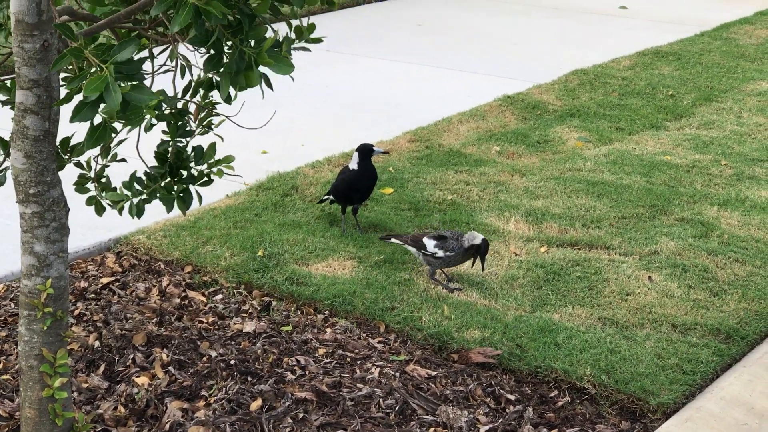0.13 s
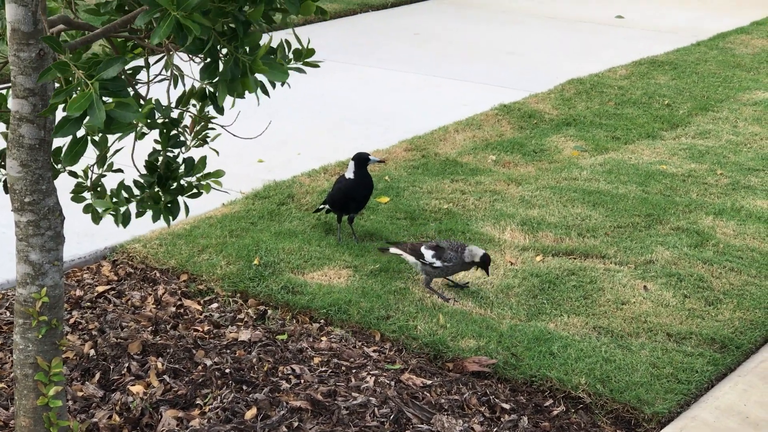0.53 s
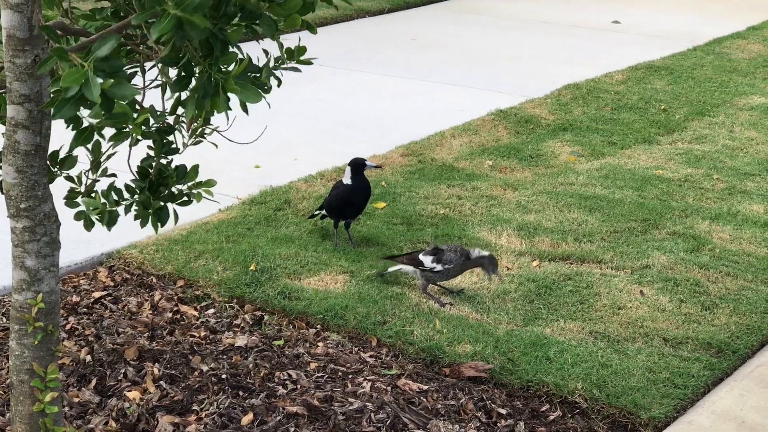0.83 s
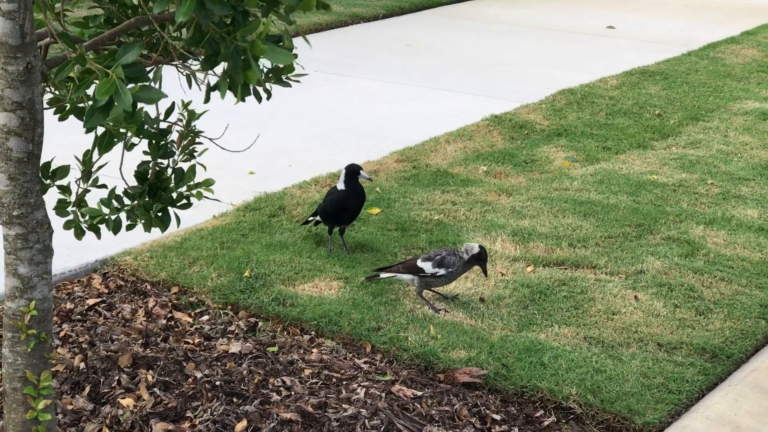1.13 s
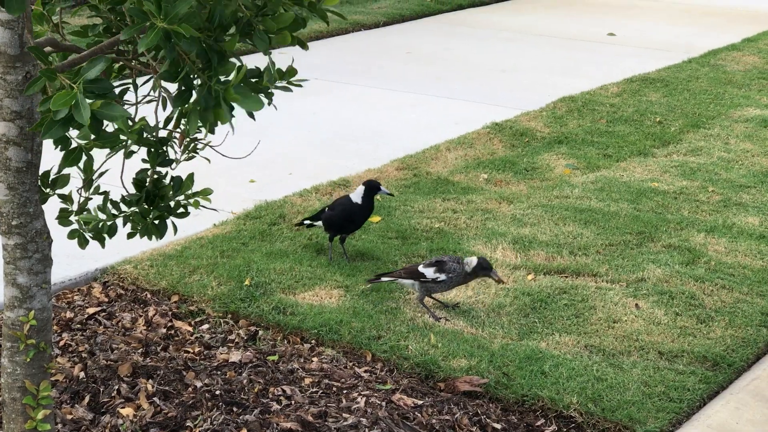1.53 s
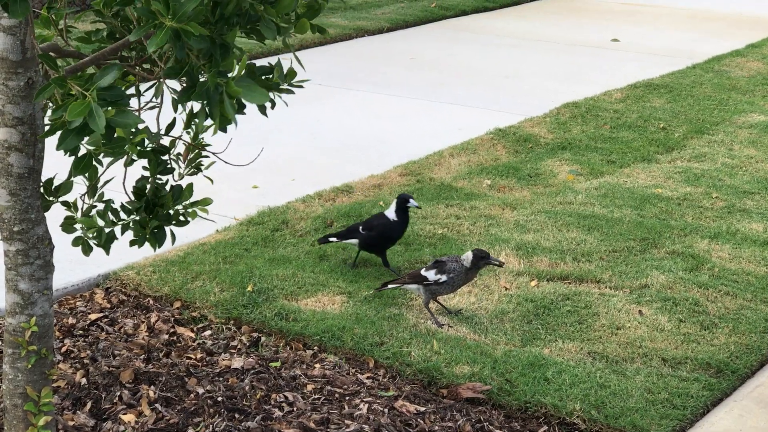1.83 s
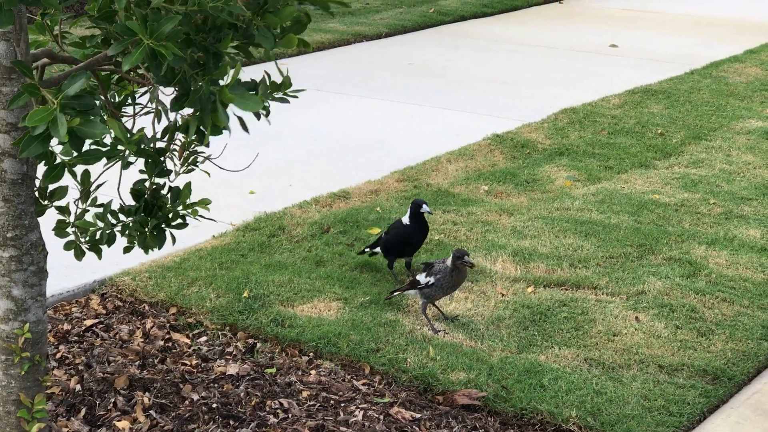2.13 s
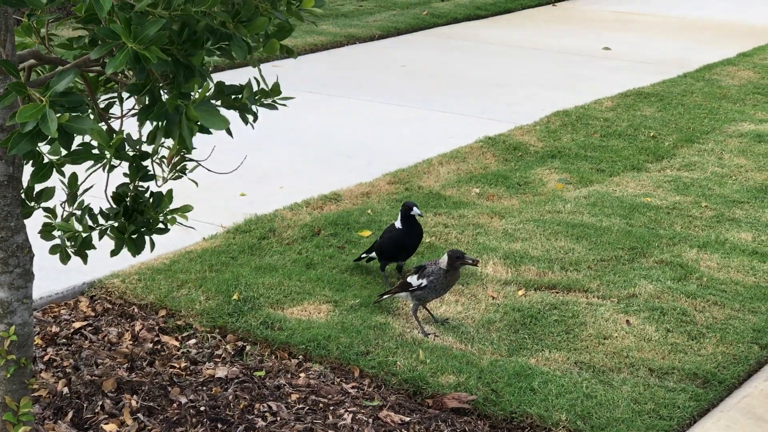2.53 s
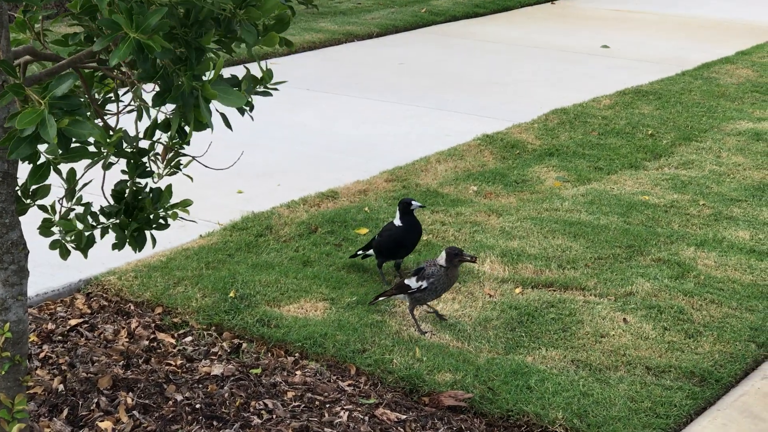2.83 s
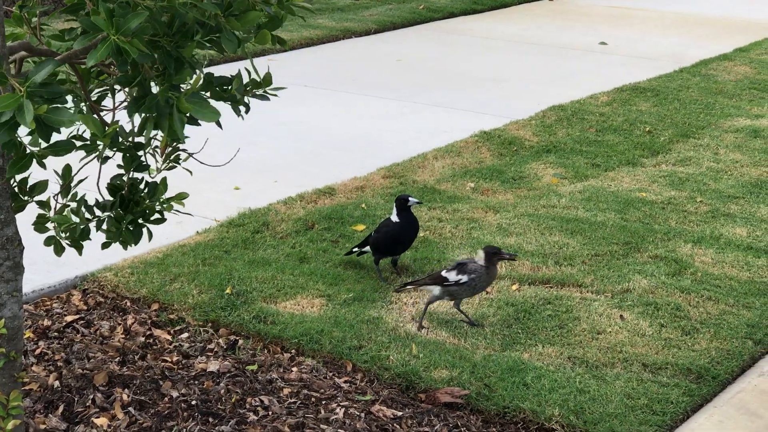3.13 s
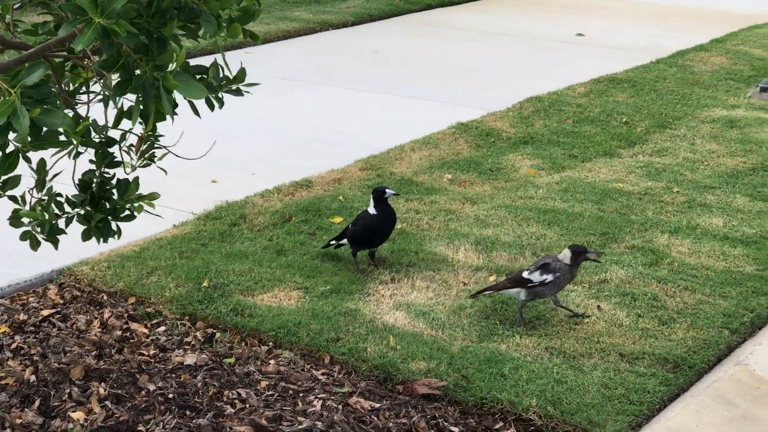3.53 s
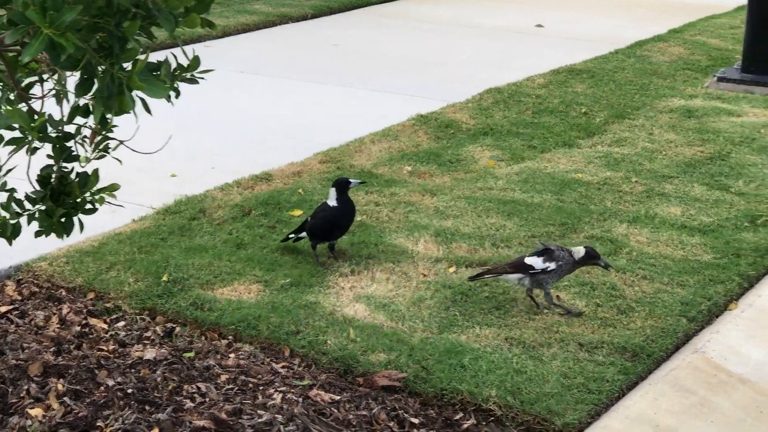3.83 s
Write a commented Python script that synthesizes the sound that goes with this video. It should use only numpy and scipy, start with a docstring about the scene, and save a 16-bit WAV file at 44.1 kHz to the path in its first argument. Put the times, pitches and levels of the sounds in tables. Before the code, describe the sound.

Whining squawks of a begging young magpie outdoors, one cracking into a rasp, above faint rumble.

```python
"""A young magpie begs on a suburban lawn: harsh rising whines, each a stack of clean harmonics
coloured by throat and beak. One call breaks into a rasp halfway, built from whole and half multiples.
Nearby walls and fences send back faint delayed copies and a thin scattered tail.
A far engine, a wavering low sine, drones under rumble and outdoor hiss; an insect, chirps and ticks
add small detail, and damped low swings are bumps on the microphone at the start."""
import sys
import numpy as np
from scipy import signal
from scipy.fft import rfft, irfft, next_fast_len
from scipy.io import wavfile
from scipy.ndimage import uniform_filter1d

SR = 44100
rng = np.random.default_rng(int(sys.argv[2]) if len(sys.argv) > 2 else 0)


def master(y):
    """Save y as 16-bit WAV."""
    cut = np.clip(np.atleast_2d(y).T, -1, 1)
    pcm = np.round(cut * 32767)  # scale
    wavfile.write(sys.argv[1], SR, pcm.astype(np.int16))


N = 175077
TIME = np.arange(N) / SR  # seconds


def from_db(db):
    """The decibel law: 20 dB is a tenfold amplitude."""
    return 10 ** (np.asarray(db) / 20)


def rms_one(x):
    """Normalisation of signal power: scale to unit rms."""
    return x / np.sqrt(np.mean(x ** 2) + 1e-20)


def at_hz(points, hz):
    """Interpolation of a spectrum in dB on a logarithmic frequency axis."""
    at, db = np.transpose(points)
    return np.interp(np.log(hz + 1e-9), np.log(at), db)


def bell(offset, half_width):
    """Gaussian weighting: height 1, falling to 1/e at the half width."""
    return np.exp(-(offset / half_width) ** 2)


def drift(rate, size):
    """Random modulation: normal values, rate of them a second, joined by lines and scaled to rms 1."""
    at = np.arange(size) * rate / SR
    values = rng.standard_normal(size // 8)
    return rms_one(np.interp(at, np.arange(size // 8), values))


def noise(spectrum, size):
    """Spectral shaping: white noise weighted in the frequency domain, rms 1."""
    padded = next_fast_len(size)
    hz = np.arange(padded // 2 + 1) * SR / padded
    white = rfft(rng.standard_normal(padded))
    return rms_one(irfft(white * from_db(at_hz(spectrum, hz)), padded)[:size])


def controls(rows):
    """Continuous gesture: the samples it covers, and its columns interpolated and smoothed along them."""
    s, *columns = np.transpose(rows)
    span = np.flatnonzero((TIME >= s[0]) & (TIME <= s[-1]))
    return span, [uniform_filter1d(np.interp(TIME[span], s, c), size=180) for c in columns]


def phase_of(hz):
    """Phase in radians is the running integral of frequency."""
    return 2 * np.pi * np.cumsum(hz) / SR


# Level of the far engine. Each row: time in seconds, level in dB before the ENGINE_DB trim.
ENGINE_POINTS = [(.25, -59), (.72, -47), (1.07, -50), (1.2, -45.5), (1.58, -47), (1.68, -58.5), (1.86, -46),
                 (1.93, -63), (2.05, -47), (2.26, -45.5), (2.34, -73.5), (2.78, -54), (3.97, -57.5)]
# Colour of the low rumble. Each row: frequency in Hz, relative density in dB per Hz.
RUMBLE_COLOUR = [(25, -15), (40, -1.5), (60, 8), (90, 1.5), (115, -3), (145, -2.5), (290, -15), (600, -42)]
# Colour of the outdoor hiss. Each row: frequency in Hz, relative density in dB per Hz.
HISS_COLOUR = [(150, -7.5), (450, 2), (1450, -1), (2100, -6), (4300, -9), (5000, -13.5), (6500, -16.5),
               (7700, -27), (9800, -25), (10400, -48), (11100, -27), (15500, -20)]
ENGINE_HZ, ENGINE_DB, ENGINE_WANDER = 60.84, -1, 0.025  # wander: rms fraction of the frequency
TRAFFIC_HZ, TRAFFIC_DB = 138.2, -64.5
RUMBLE_DB, RUMBLE_SWELL_DB = -53, 1.5
HISS_DB = -66


def street():
    """Superposition: frequency-modulated engine drone and fainter hum over broadband rumble and hiss."""
    engine_phase = phase_of(ENGINE_HZ * (1 + ENGINE_WANDER * drift(16, N)))
    engine_db = np.interp(TIME, *np.transpose(ENGINE_POINTS)) + ENGINE_DB
    drone = from_db(engine_db) * np.sin(engine_phase)
    hum_gain = from_db(TRAFFIC_DB + 1.14 * drift(8.5, N))
    hum = hum_gain * np.sin(phase_of(TRAFFIC_HZ * (1 + 0.0199 * drift(5, N))))
    rumble = from_db(RUMBLE_DB + RUMBLE_SWELL_DB * drift(11, N)) * noise(RUMBLE_COLOUR, N)
    hiss = from_db(HISS_DB) * noise(HISS_COLOUR, N)
    return np.sqrt(2) * (drone + hum) + rumble + hiss


INSECT_HZ, INSECT_WIDTH_HZ, INSECT_DB = 8770, 330, -86


def insect():
    """Band-limited noise: a narrow filter leaves a thin insect hiss."""
    edges = [INSECT_HZ - INSECT_WIDTH_HZ / 2, INSECT_HZ + INSECT_WIDTH_HZ / 2]
    band = signal.butter(2, edges, "band", fs=SR, output="sos")
    return from_db(INSECT_DB) * rms_one(signal.sosfilt(band, rng.standard_normal(N)))


# Chirps of far birds. Each row: centre in seconds, pitch in Hz, rms level in dB at the centre.
CHIRP_ROWS = [(1.03, 3150, -73.5), (3.215, 4530, -71.5)]
CHIRP_S = .025  # half width


def chirps():
    """Tone bursts: an unsteady sine under a Gaussian envelope."""
    out = np.zeros(N)
    for s, hz, db in CHIRP_ROWS:
        tone = np.sqrt(2) * np.sin(phase_of(hz * (1 + 0.0118 * drift(400, N))))
        out += from_db(db) * bell(TIME - s, CHIRP_S) * tone
    return out


# Small ticks in the grass and mulch. Each row: start in seconds, rms level in dB at the start.
TICK_ROWS = [(0.86, -59), (3.687, -59)]
TICK_T60_S = 0.038


def ticks():
    """Exponential decay: each tick is coloured noise that starts at once and dies away."""
    out = np.zeros(N)
    crackle = noise([(500, -18), (1500, 18), (15000, -37)], N)  # (Hz, dB)
    for s, db in TICK_ROWS:
        age = np.clip(TIME - s, 0, 1)
        out += crackle * (TIME >= s) * from_db(db - 60 * age / TICK_T60_S)
    return out


# Bumps on the microphone. Each row: start in seconds, frequency in Hz, amplitude in dB before the
# attack and decay, 60 dB decay time in seconds.
BUMP_ROWS = [(.002, 138, -19, 0.024), (0.118, 116.6, -40.5, 0.31), (.162, 276.5, -32, 0.049),
             (0.173, 98, -25, 0.076)]
BUMP_ATTACK_S = 0.0015


def bumps():
    """Damped oscillation: each bump is a low sine that decays exponentially."""
    out = np.zeros(N)
    for s, hz, db, t60 in BUMP_ROWS:
        age = np.clip(TIME - s, 0, 1)
        attack = (1 - np.exp(-age / BUMP_ATTACK_S)) ** 2
        out += from_db(db - 60 * age / t60) * attack * np.sin(2 * np.pi * hz * age)
    return out


# Echoes from walls and fences. Each row: delay in seconds, gain in dB.
ECHO_ROWS = [(0.023, -19.5), (0.088, -28.5)]
# Colour of the scattered tail. Each row: frequency in Hz, relative level in dB.
SCATTER_SPECTRUM = [(1250, -8), (2380, -12), (2610, 4.5), (2850, -7), (9000, -8.5)]
SCATTER_DB, SCATTER_T60_S = -21, 0.84
ECHO_CUT_HZ = 15000


def garden(x):
    """Convolution with an impulse response: discrete reflections and a decaying scattered tail."""
    tail = noise(SCATTER_SPECTRUM, SR) * from_db(-60 * TIME[:SR] / SCATTER_T60_S)
    response = from_db(SCATTER_DB) * rms_one(tail) / np.sqrt(SR)  # unit energy, then the gain
    for delay, db in ECHO_ROWS:
        response[int(delay * SR)] += from_db(db)
    lowpass = signal.butter(2, ECHO_CUT_HZ, fs=SR, output="sos")
    return signal.sosfilt(lowpass, signal.fftconvolve(x, response)[:N])


# The last of an earlier whine, dying away in its echo.
# Each row: time in seconds, pitch in Hz, rms level in dB.
LAST_ROWS = [(0, 1246, -46.5), (.027, 1286, -45), (.036, 1347, -53.5), (.064, 1264, -62),
             (.125, 1295, -63.5), (.165, 1190, -69)]


def last_of_whine():
    """A pure tone: only the fundamental is left as the beak closes."""
    span, (pitch, db) = controls(LAST_ROWS)
    out = np.zeros(N)
    out[span] = np.sqrt(2) * from_db(db) * np.sin(phase_of(pitch))
    return out


# Colour of the breath turbulence, in rasp and whine. Each row: frequency in Hz, relative level in dB.
AIR_SPECTRUM = [(700, -22), (1500, -6), (3300, 20), (5500, -4), (9500, -8.5), (15000, -18)]
# The voice break. Each row: time in seconds, pitch in Hz, level in dB of the partials before the rattle.
RASP_ROWS = [(1.556, 1173, -62), (1.559, 1180, -49.5), (1.58, 1151, -53.5), (1.61, 1155, -56.5),
             (1.635, 1129, -55), (1.647, 1012, -53), (1.655, 994, -50), (1.66, 1220, -65)]
# Unsteady partials of the break. Each row: multiple of the pitch, relative level in dB.
RASP_PARTIAL_ROWS = [(1, -9.5), (1.5, 4.5), (2, -3), (2.5, -7), (3, 4), (4, -27)]
# Jitter: rms fraction of the pitch; slip: rms radians; air: relative to the partials at the loudest.
RASP_JITTER, RASP_FLUTTER_DB, RASP_SLIP, RASP_AIR_DB = 0.014, 3.5, .7, -5
RATTLE_HZ, RATTLE_DEPTH = 230, .75


def rasp():
    """Period doubling: the syrinx adds half multiples, rattles unevenly and is noisiest when loudest."""
    span, (pitch, level_db) = controls(RASP_ROWS)
    size = len(span)
    phase = phase_of(pitch * (1 + RASP_JITTER * drift(604, size)))
    voice = np.zeros(size)
    for k, db in RASP_PARTIAL_ROWS:
        gain = from_db(db + RASP_FLUTTER_DB * drift(321, size))
        voice += gain * np.sin(k * phase + RASP_SLIP * drift(394, size))
    rattle = 1 + RATTLE_DEPTH * np.cos(phase_of(RATTLE_HZ * (1 + drift(RATTLE_HZ, size) / 2)))
    air = from_db(RASP_AIR_DB + level_db - level_db.max()) * noise(AIR_SPECTRUM, size)
    out = np.zeros(N)
    out[span] = from_db(level_db) * rms_one(rattle) * (rms_one(voice) + air)
    return out


# Gestures of the whines. Each row: time in seconds, pitch in Hz, fundamental level in dB, overtone
# level in dB at 3 kHz before the throat and beak, brightness in dB per octave, beak resonance in Hz.
BEFORE_BREAK = [(1.448, 1090, -90, -83, 9, 3640.0), (1.457, 1065, -54.5, -67.5, -2, 3160.0),
                (1.475, 1115, -51.5, -58.5, 0, 3300), (1.505, 1126, -51.8, -56.5, -3, 3340),
                (1.54, 1138, -49, -54.5, -3, 4070), (1.557, 1134, -47, -60, 0.5, 3380),
                (1.562, 1260, -45, -70, -1.8, 3620.0)]
AFTER_BREAK = [(1.652, 1310, -76, -93, -6, 2600), (1.659, 1247, -48.5, -55.5, 0, 2570),
               (1.689, 1231, -49, -59, -3, 2430), (1.715, 1228, -49, -60, -1.5, 2474),
               (1.735, 1137, -56, -70.5, -2, 2180), (1.752, 983, -88, -86, -5, 2095)]
LOUD_WHINE = [(2.003, 648, -72, -88, -17, 2440.0), (2.015, 795, -67, -72, -1, 2670),
              (2.029, 881, -63.5, -64, 5, 2960), (2.075, 927, -58.0, -59, 4, 2730),
              (2.093, 962, -52, -53, 2.5, 3580), (2.102, 945, -53, -52, 1.5, 3400),
              (2.119, 1086, -46.5, -50, 1.5, 3530), (2.155, 1098, -46, -54.5, 5, 3490),
              (2.2, 1164, -43.5, -52.5, 3.5, 2840), (2.254, 1235, -40.5, -54, 1.5, 2840),
              (2.308, 1273, -45, -63, -7.5, 3400), (2.319, 1262, -76, -64, -15, 3600)]
RISING_WHINE = [(2.598, 712, -85, -100, -17, 2750.0), (2.62, 903, -59.5, -72.5, 3, 2314),
                (2.645, 927, -52.4, -64.5, 3, 2400), (2.7, 999, -52, -64, 1.5, 2800),
                (2.745, 1105, -45.5, -61, 5, 2940), (2.796, 1202, -41.5, -61.5, 2.5, 2220),
                (2.834, 1290, -39.0, -66, 4.5, 3160), (2.895, 1356, -40.5, -62, 2, 1713),
                (2.921, 1382, -45.5, -71, -3, 1650), (2.955, 1060, -63.5, -86, 3, 2060)]
ARCHED_WHINE = [(3.24, 684, -70, -92, -23, 2350), (3.255, 848, -63, -68.5, 4, 1900),
                (3.276, 916, -57.5, -62, 1.5, 2200), (3.343, 1063, -49, -61.5, 5.5, 3200),
                (3.375, 1147, -45, -61.5, 4, 3270), (3.41, 1184, -44, -58.5, 2.5, 2920),
                (3.449, 1246, -42, -64.5, 8, 2450.0), (3.525, 1301, -38.5, -61, 1, 1920),
                (3.555, 1285, -42, -64.5, 2, 2200), (3.593, 1035, -65, -79, -2, 2850)]
SOFT_WHINE = [(3.722, 756, -68, -84, -1, 1846), (3.736, 897, -65, -72.5, 0.5, 3100),
              (3.769, 923, -61, -64, -3, 2760), (3.804, 1008, -54.5, -67.5, 0, 3190),
              (3.866, 1084, -60, -64.5, 3, 2400), (3.911, 1149, -53.5, -65, 1.5, 2420),
              (3.935, 1106, -71, -71, 1, 2650), (3.965, 950, -58.5, -83, -9, 2870)]
# The calls. Each row: gesture, changes in dB of the 2nd, 3rd and 4th harmonics, weak harmonic number.
WHINES = [(BEFORE_BREAK, -7, 2.8, 2.6, 6.3), (AFTER_BREAK, 1.3, -8, -5.5, 5.7),
          (LOUD_WHINE, 1.8, 0.25, 3.9, 7.03), (RISING_WHINE, 3.7, 3.3, 3.7, 6.83),
          (ARCHED_WHINE, 3.7, 0.94, 2.6, 6.25), (SOFT_WHINE, 1.8, 2.4, 6.9, 6.96)]
# Fixed colour of the throat. Each row: frequency in Hz, gain in dB.
THROAT_COLOUR = [(1600, 3.2), (2400, -1.5), (3300, .4), (4400, -6), (5500, -9), (8800, -9), (10400, -16),
                 (11500, -15.5), (13500, -24.6), (15500, -33.5)]
# The voice catches: overtones near a frequency briefly change level.
# Each row: centre in seconds, frequency in Hz, change in dB.
CATCH_ROWS = [(2.099, 5700, 15.5), (2.818, 2510, 0), (3.352, 4300, -13), (3.491, 2550, -10)]
CATCH_S, CATCH_HALF_WIDTH_HZ = 0.018, 360
BEAK_BOOST, BEAK_HALF_WIDTH_HZ = 4.32, 180  # boost: amplitude added at resonance
JITTER, JITTER_PER_S = 0.0037, 200  # rms fraction of the pitch, random values a second
SHIMMER_DB, OVERTONE_WAVER_DB = .5, 1.02  # the waver is per octave of harmonic number
BEAT_HZ, BEAT_HALF_WIDTH_HZ, BEATS_PER_S, BEAT_DEPTH = 2640, 110, 55, .5  # mean beat rate
NOTCH_DB, NOTCH_HALF_WIDTH = -15, 0.69  # depth, half width in harmonics
# The notch fills in as the treble approaches the first level, over the range that follows.
NOTCH_GONE_DB, NOTCH_FILL_DB = -49.5, 0.5
AIR_DB = -29  # turbulence against the overtones, before it pulses with the voice
ROUGH_GLIDE_HZ_PER_S = 4200  # turbulence grows where the pitch slips faster than this
PUFF_DB, PUFF_S = -64.5, 0.009  # rough start: level before the pulsing, delay and half width
ATTACK_S, RELEASE_S = 0.0022, 0.0023


def whine(rows, second_db, third_db, fourth_db, weak_harmonic):
    """Source and filter: a puff, then syrinx harmonics that sweep through throat and beak resonances."""
    span, (pitch, fundamental_db, overtones_db, bright_db, beak_hz) = controls(rows)
    size, t = len(span), TIME[span]
    low_db = {2: second_db, 3: third_db, 4: fourth_db}
    phase = phase_of(pitch * (1 + JITTER * drift(JITTER_PER_S, size)))
    treble_db = overtones_db + bright_db
    notch_db = NOTCH_DB * np.clip((NOTCH_GONE_DB - treble_db) / NOTCH_FILL_DB, 0, 1)
    voice = from_db(fundamental_db) * np.sin(phase)
    for k in range(2, 19):
        hz = k * pitch
        beak = 1 + BEAK_BOOST / np.hypot(1, (hz - beak_hz) / BEAK_HALF_WIDTH_HZ)
        db = overtones_db + bright_db * np.log2(hz / 3000) + low_db.get(k, 0)
        db = db + at_hz(THROAT_COLOUR, hz) + notch_db * bell(k - weak_harmonic, NOTCH_HALF_WIDTH)
        for s, catch_hz, change_db in CATCH_ROWS:
            db = db + change_db * bell(t - s, CATCH_S) * bell(hz - catch_hz, CATCH_HALF_WIDTH_HZ)
        if k == 2:  # the second harmonic beats while it is near BEAT_HZ
            beat_rate = BEATS_PER_S * (1 + np.tanh(drift(BEATS_PER_S, size)) / 2)
            beat = np.cos(phase_of(beat_rate))
            db = db + 20 * np.log10(1 + BEAT_DEPTH * bell(hz - BEAT_HZ, BEAT_HALF_WIDTH_HZ) * beat)
        db = db + OVERTONE_WAVER_DB * np.log2(k) * drift(72.0, size)
        below_nyquist = hz < SR / 2
        tone = np.sin(k * phase + rng.uniform(0, 2 * np.pi))
        voice += from_db(db) * beak * below_nyquist * tone
    puff = from_db(PUFF_DB) * bell(t - t[0] - PUFF_S, PUFF_S)
    roughness = np.hypot(1, np.gradient(pitch) * SR / ROUGH_GLIDE_HZ_PER_S)
    turbulence = puff + roughness * from_db(overtones_db + AIR_DB)
    air = turbulence * noise(AIR_SPECTRUM, size) * (1 + np.cos(phase))
    fade = np.clip(np.minimum((t - t[0]) / ATTACK_S, (t[-1] - t) / RELEASE_S), 0, 1)
    shimmer = from_db(SHIMMER_DB * drift(300, size))
    out = np.zeros(N)
    out[span] = fade * (np.sqrt(2) * voice * shimmer + air)
    return out


def scene():
    """Linear superposition of the bird, its echoes and the background."""
    background = street() + bumps() + insect() + chirps() + ticks()
    bird = last_of_whine() + sum(whine(*call) for call in WHINES) + rasp()
    return (bird + garden(bird) + background)[None]


CUTOFF_HZ = 15700


def record(dry):
    """Band limitation: a steep elliptic low-pass cuts the top."""
    lowpass = signal.ellip(12, .1, 80, CUTOFF_HZ, fs=SR, output="sos")
    return signal.sosfilt(lowpass, dry)


dry = scene()
out = record(dry)
master(out)
```